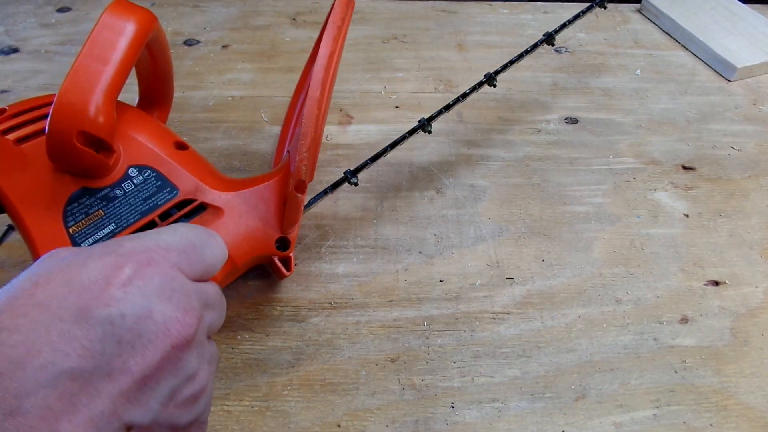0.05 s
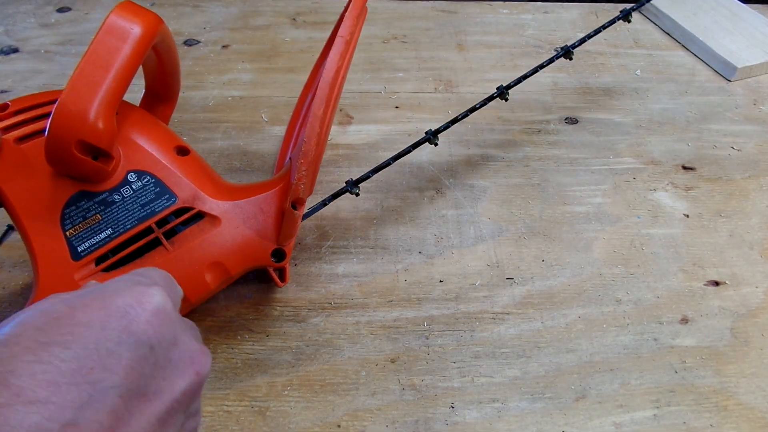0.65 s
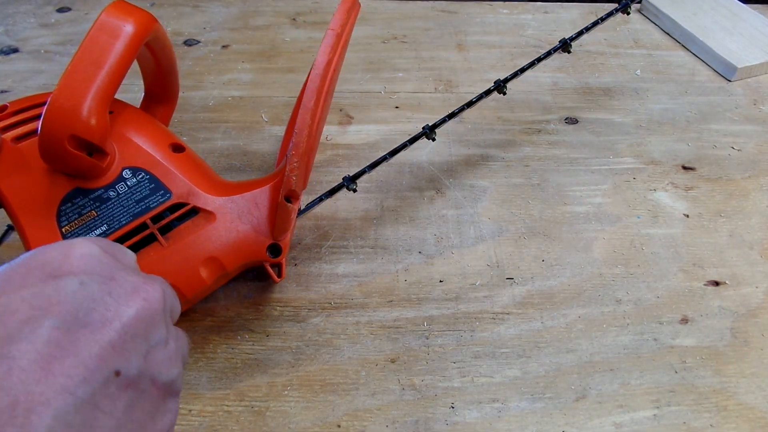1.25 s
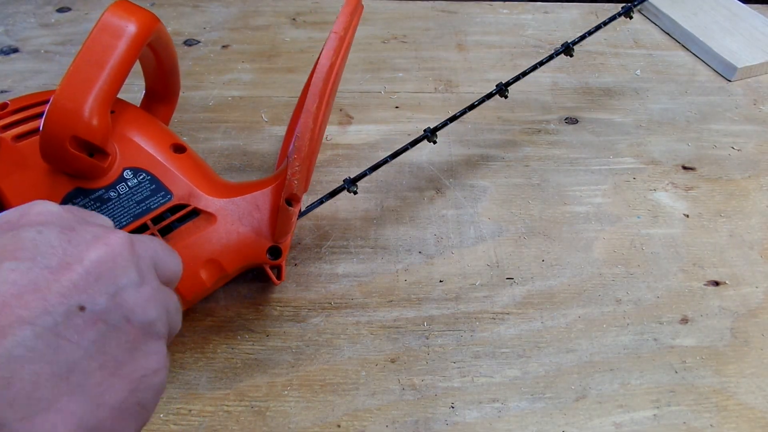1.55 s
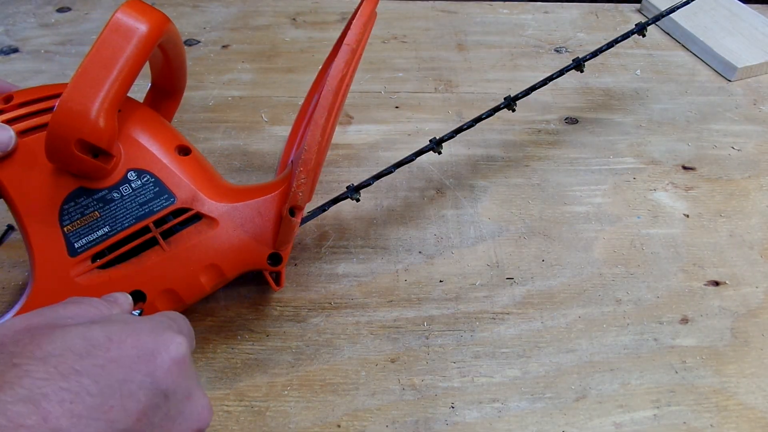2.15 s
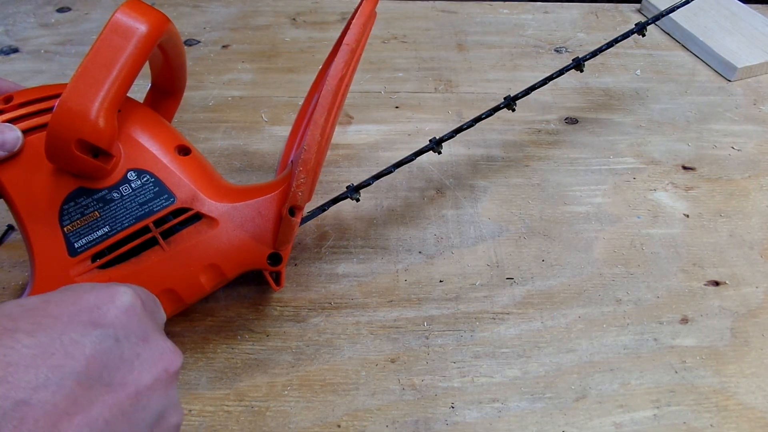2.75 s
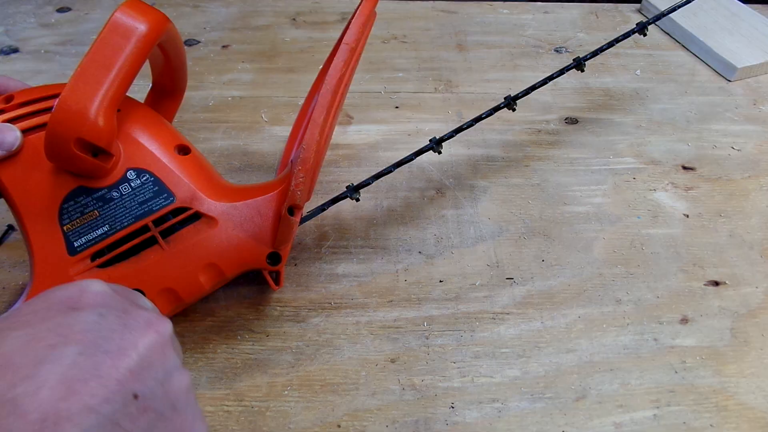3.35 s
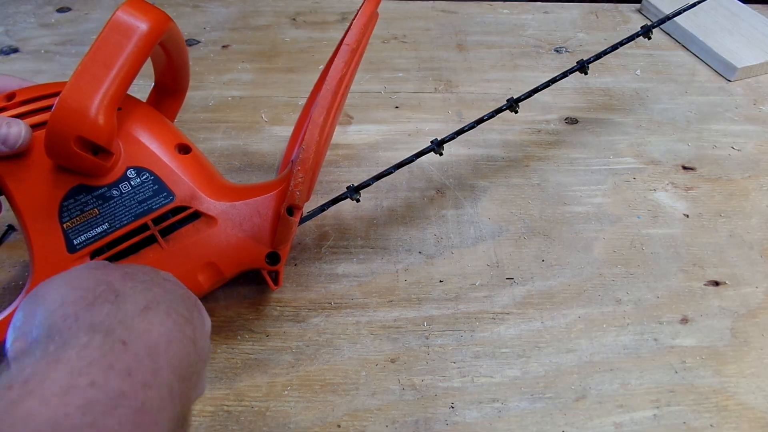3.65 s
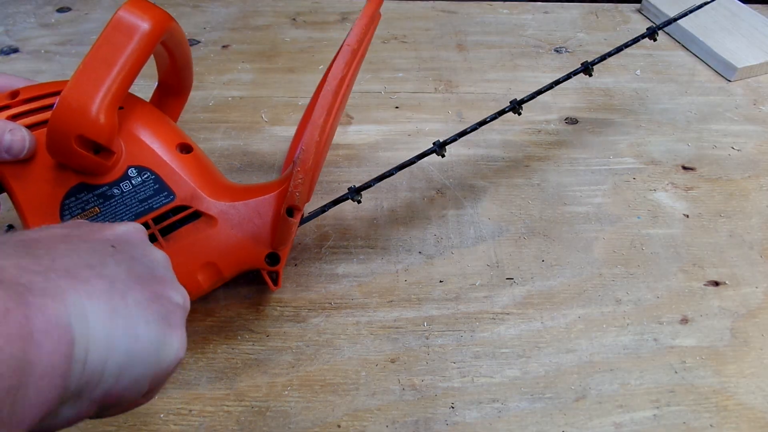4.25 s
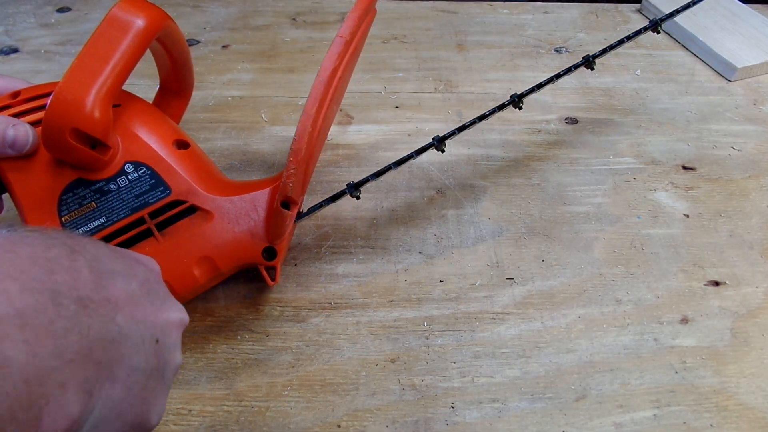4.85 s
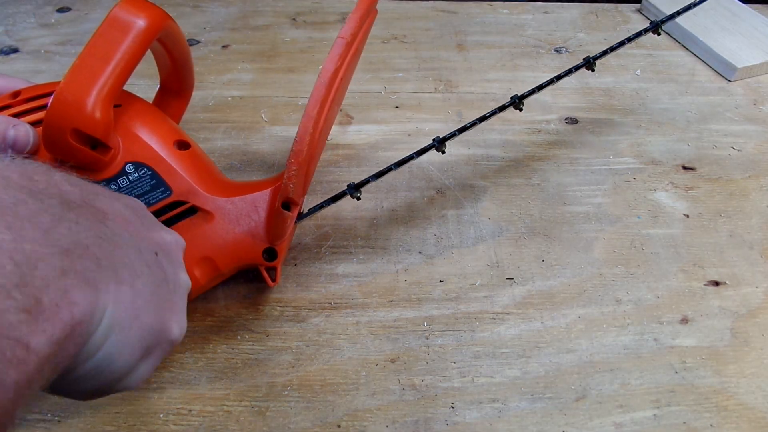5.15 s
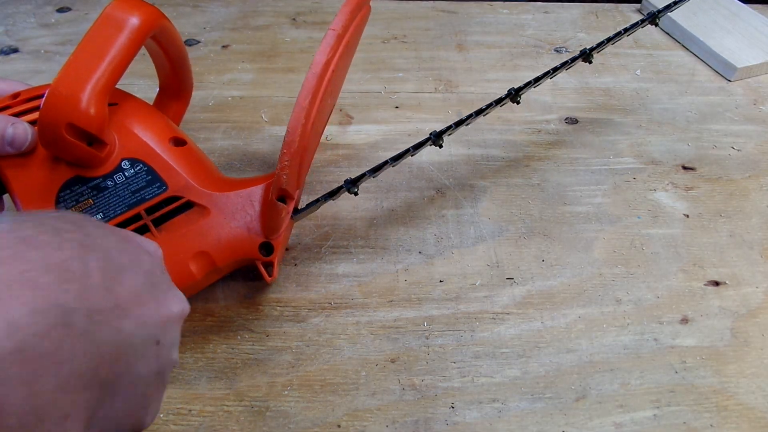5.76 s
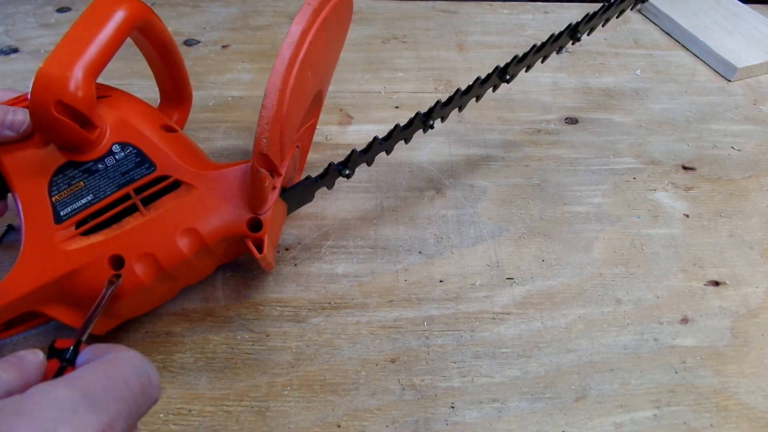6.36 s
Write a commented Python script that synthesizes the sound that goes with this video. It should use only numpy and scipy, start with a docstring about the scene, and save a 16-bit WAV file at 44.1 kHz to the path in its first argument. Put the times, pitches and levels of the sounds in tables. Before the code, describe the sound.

A hollow plastic tool housing snaps against a wooden workbench and lands with a thud. A screwdriver then works at stubborn screws, its tip slipping with irregular knocks, small metal clicks and short scrapes. A screw squeaks briefly about two seconds in. After a quieter spell, two sharper knocks stand out among lighter taps and soft hand rubbing. The sounds are close, with a short workshop echo and faint hiss.

```python
"""Hollow plastic knocks, dull thumps and a squeak: a screwdriver works stubborn screws out of a tool
housing on a wooden workbench. The tip slips and strikes the screw head; each impact excites the damped
modes of the shell and the bench. Stick-slip friction makes one thread squeak, the blade scrape in its
hole and the hand hiss on the grip. A bare workshop reverberates; faint hiss swells with each knock."""
import sys
import numpy as np
from scipy import signal
from scipy.fft import rfft, irfft, next_fast_len
from scipy.io import wavfile
from scipy.ndimage import uniform_filter1d

SR = 44100
rng = np.random.default_rng(int(sys.argv[2]) if len(sys.argv) > 2 else 0)


def waveform_to_disk(signal):
    """Save audio, clipped to [-1, 1], as 16-bit WAV at the path in sys.argv[1]."""
    frames = np.transpose(np.atleast_2d(signal))
    scaled = np.clip(frames, -1, 1) * 32767
    samples = np.round(scaled).astype(np.int16)
    wavfile.write(sys.argv[1], SR, samples)


N = 282235
T = np.arange(N) / SR
RING_T = T[:SR // 4]  # time axis of one impact

# the tip slips and lands: start_s, level_db, brightness_db, tick_db, ring_hz, rebound_db
TIP_KNOCKS = [(1.454, -27.5, -2, -48, 865, -12), (1.5, -19, -3.5, -63, 957, -4.5),
              (1.8138, -30, -4.5, -46, 714, 1.5), (1.924, -34.5, -16, -54, 630, -12),
              (1.946, -31, -14, -45, 1070, -9), (2.2112, -33, -8.5, -56, 1444, -20),
              (2.231, -29.5, -4, -47.5, 716, -13), (2.634, -27.5, -14, -50, 753, -12.5),
              (4.2, -15, -4, -22.5, 756, -12.5), (4.493, -27, -7, -51, 930, -4),
              (4.611, -33.5, -15, -50, 560, -3), (4.974, -34, -3.5, -46, 2850, -12),
              (5.066, -37, -21, -51, 817, -20), (5.218, -19, 2, -27.5, 886, -1.5),
              (5.607, -37.5, -17, -49, 884, -19)]
# the shell's dense, quickly damped overtones: frequency_hz, gain_db
CRACK_SPECTRUM = [(200, -24.5), (450, -4), (800, 2.5), (1800, -4), (3000, -8), (4000, -18), (6000, -28.5),
                  (10000, -34.5)]
# the bright part of sliding friction: frequency_hz, gain_db
CRISP_SPECTRUM = [(1500, -1), (4000, 0.5), (9000, 0.5), (13000, 0), (16000, -3)]


def undb(db):
    """Amplitude ratio of a level in decibels."""
    return 10 ** (np.asarray(db) / 20)


def colour(x, spectrum):
    """Minimum-phase filter: folding the cepstrum gives the spectral outline a causal response."""
    size = next_fast_len(len(x) + 4096, True)
    hz, db = np.transpose(spectrum)
    bin_hz = np.maximum(np.fft.rfftfreq(size, 1 / SR), 1)
    gain = undb(np.interp(np.log(bin_hz), np.log(hz), db))
    cepstrum = irfft(np.log(gain), size)
    cepstrum[1:size // 2] *= 2
    cepstrum[size // 2 + 1:] = 0
    return irfft(rfft(x, size) * np.exp(rfft(cepstrum)), size)[:len(x)]


def noise(spectrum):
    """Filtered Gaussian noise of unit rms."""
    x = colour(rng.standard_normal(N), spectrum)
    return x / x.std()


def waver(samples):
    """Random fluctuation of unit spread, smoothed by a moving average."""
    x = uniform_filter1d(rng.standard_normal(N), size=samples)
    return x / x.std()


def grains(rate_hz, spread_db, spectrum):
    """Friction as shot noise: randomly timed slips of uneven size, at unit rms."""
    slips = (rng.random(N) < rate_hz / SR) * rng.choice([-1, 1], N)
    sizes = undb(spread_db * np.minimum(rng.exponential(size=N), 4))
    x = colour(slips * sizes, spectrum)
    return x / x.std()


def stroke(peak_s, build_s, release_s):
    """Envelope of a slide: exponential growth, then exponential decay."""
    return np.exp(np.minimum((T - peak_s) / build_s, (peak_s - T) / release_s))


def decay(t60_s):
    """Exponential damping, 60 dB in t60_s."""
    return np.exp(-np.log(1000) * RING_T / t60_s)


def at_level(x, db):
    """Scale an impact so that the rms of its loudest 4 ms is db."""
    return x * undb(db) / np.sqrt(uniform_filter1d(x * x, size=SR // 250).max())


def burst(spectrum, t60_s):
    """Modal overlap: many close, damped resonances merge into decaying noise."""
    return colour(rng.standard_normal(len(RING_T)) * decay(t60_s), spectrum)


def ring(modes, spread_db, detune):
    """Superposition of damped modes; strike point and grip scatter their levels and pitches."""
    scatter = rng.standard_normal((len(modes), 2))
    out = 0
    for k, ((hz, db, t60_s), (strike, grip)) in enumerate(zip(modes, scatter)):
        tone = np.sin(2 * np.pi * hz * (1 + detune * grip) * RING_T)
        out += (-1) ** k * undb(db + spread_db * strike) * decay(t60_s) * tone
    return out


def add(out, start_s, x):
    """Superpose x on out from start_s."""
    start = max(int(start_s * SR), 0)
    out[start:start + len(x)] += x[:N - start]


def room_tone():
    """Ambient noise of a still room, strongest in the bass."""
    # still air: frequency_hz, gain_db
    air_spectrum = [(25, -4), (105, -3), (200, -1.5), (700, -4), (2000, -10), (6000, -26.5), (16000, -25)]
    return noise(air_spectrum) * undb(-61)


def reverberation(x, build_s):
    """Wall reflections build a diffuse field that decays soonest in the top treble."""
    # workshop reverberation: frequency_hz, level_db, t60_s
    room_bands = [(100, -14, 0.52), (248, -6.5, 0.73), (587, -7, 0.46), (1370, -5.5, 0.65),
                  (2730, -8.5, 0.52), (5000, -7, 0.53), (12000, -13, 0.25)]
    hz, db, t60_s = np.transpose(room_bands)
    t = T[:SR]
    log_hz = np.log(np.maximum(np.fft.rfftfreq(SR, 1 / SR), 1))
    spectrum = rfft(rng.standard_normal(SR))
    onset = 1 - np.exp(-(t / build_s) ** 2)
    response = 0
    for share, band_db, band_t60_s in zip(np.eye(len(hz)), db, t60_s):
        band = irfft(spectrum * np.interp(log_hz, np.log(hz), share), SR)
        envelope = np.exp(-np.log(1000) * t / band_t60_s) * onset
        response += undb(band_db) * band * envelope / np.linalg.norm(envelope)
    return signal.fftconvolve(x, response)[:N]


def hand():
    """Sliding friction of skin, crisper with speed, over the rumble of the arm's shifting load."""
    # the hand slides to a new grip: peak_s, build_s, level_db
    regrips = [(2.7, 0.14, -69), (3.58, 0.16, -54), (5.1, 0.092, -59), (5.88, 0.15, -55.5),
               (6.08, 0.078, -64)]
    # skin on the grip: frequency_hz, gain_db
    skin_spectrum = [(200, 10), (700, 15), (1500, 10), (3000, 8), (6000, -2.5), (10000, -3), (13000, 1),
                     (16000, -1)]
    # the loaded housing: frequency_hz, gain_db
    rumble_spectrum = [(25, -18), (65, 3.5), (80, -9.5), (110, 5.5), (150, -7.5), (350, -4.5), (700, -7),
                       (1500, -32)]
    # rumble under the arm's weight: time_s, level_db
    leaning = [(0, -53.5), (0.65, -52), (1.0, -65), (1.3, -56), (1.8, -55.5), (3.0, -55.5), (3.5, -55.5),
               (3.8, -56.5), (4.1, -51), (5.45, -54.5), (5.7, -56), (6.4, -62)]
    speed = sum(undb(db) * stroke(s, build_s, release_s=0.13) for s, build_s, db in regrips)
    rub = grains(rate_hz=12000, spread_db=2.5, spectrum=skin_spectrum) * undb(2.5)
    crisp = grains(rate_hz=3000, spread_db=3, spectrum=CRISP_SPECTRUM) * speed / speed.max()
    rumble = noise(rumble_spectrum) * undb(np.interp(T, *np.transpose(leaning)))
    return (rub + crisp) * speed + rumble


def blade_scrapes():
    """Friction of steel on plastic: dense micro-slips with sparse grit on top."""
    # the blade drags in the screw hole, then lets go: peak_s, build_s, level_db
    scrapes = [(1.675, 0.046, -43), (1.96, .04, -43), (4.02, 0.064, -55), (4.63, 0.049, -58),
               (4.801, 0.04, -51), (5.447, 0.016, -39), (5.889, 0.085, -43)]
    # steel on plastic: frequency_hz, gain_db
    scrape_spectrum = [(150, -23.5), (450, 0.5), (800, 2.5), (1300, 2), (2000, -7.5), (4000, -17),
                       (7000, -22), (16000, -28)]
    pressure = sum(undb(db) * stroke(s, build_s, release_s=0.042) for s, build_s, db in scrapes)
    grit = grains(rate_hz=250, spread_db=3.5, spectrum=CRISP_SPECTRUM)
    catching = undb(2.5 * waver(samples=400))
    drag = grains(rate_hz=1200, spread_db=0.5, spectrum=scrape_spectrum)
    return (drag + undb(-19.5) * grit) * pressure * catching


def bench_thump(db):
    """Modal response of the bench top, which radiates little below its first mode."""
    # the bench with the housing on it: frequency_hz, level_db, t60_s
    bench_modes = [(108.5, 4, 0.18), (113, -10, 0.4), (157, -13.5, 0.096), (199.7, -8.5, 0.21),
                   (260, -2, 0.063), (282, -4.5, 0.018), (335.2, -8.5, 0.2), (430, -7, 0.059)]
    radiation = signal.butter(2, 80, "high", fs=SR, output="sos")
    vibration = ring(bench_modes, spread_db=1, detune=0.015)
    return at_level(signal.sosfilt(radiation, vibration), db)


def steel_tick(db):
    """A hard, brief contact of steel on steel puts its energy in the treble."""
    # steel on steel: frequency_hz, gain_db
    tick_spectrum = [(1500, -28), (4500, 5.5), (6500, -1), (9500, -4.5), (12500, 0.5), (16000, -2)]
    return at_level(burst(tick_spectrum, t60_s=0.025), db)


def shell_blow():
    """Impulse response of the shell: distinct modes and the crack of overlapping overtones."""
    # resonances of the plastic shell: frequency_hz, level_db, t60_s
    shell_modes = [(560, -20, 0.057), (761, -3, 0.064), (853, 3, 0.042), (891, -14.5, 0.24),
                   (1150, -14, 0.012), (1324, -5, 0.07), (1670, -13.5, 0.13), (1882, 1.5, 0.024),
                   (2075, -2.5, 0.028), (2428, -6, 0.048), (2660, -1.5, 0.0095), (2785, -5.5, 0.027),
                   (3173, -2.5, 0.03)]
    ringing = ring(shell_modes, spread_db=2.5, detune=0.02)
    return at_level(ringing, -2) + at_level(burst(CRACK_SPECTRUM, t60_s=0.056), 0)


def hand_bumps():
    """A soft, long contact acts as a low-pass: the shell answers dully and the bench swells in."""
    # fingers and wrist bump the housing: start_s, thump_db
    bumps = [(.79, -48), (1.098, -49.5), (1.761, -42.5), (2.02, -47.5), (2.332, -46), (2.641, -44),
             (3.43, -44), (3.486, -45), (4.02, -43)]
    out = np.zeros(N)
    softness = signal.butter(1, 1500, fs=SR, output="sos")
    for start_s, db in bumps:
        dull = signal.sosfilt(softness, burst(CRACK_SPECTRUM, t60_s=0.069))
        bump = at_level(dull, db - 4.5) + bench_thump(db)
        add(out, start_s, bump * (1 - decay(0.032)))
    return out


def tip_clicks():
    """Light impacts on the screw head pass little energy to the shell."""
    # the unloaded tip feels for the slot: start_s, tick_db, shell_db
    clicks = [(1.273, -60, -52.5), (1.344, -62, -53), (1.661, -43, -36), (2.008, -48, -39),
              (2.563, -54, -41.5), (2.673, -49, -62), (3.2038, -39.5, -39.5), (3.275, -57, -45.5),
              (3.967, -58, -45.5), (4.002, -44, -40.5), (4.062, -54, -43.5), (4.64, -48, -53),
              (5.097, -47.5, -52), (5.909, -43.5, -43), (5.919, -60, -46.5)]
    out = np.zeros(N)
    for start_s, tick_db, shell_db in clicks:
        add(out, start_s, steel_tick(tick_db) + at_level(shell_blow(), shell_db))
    return out


def tip_skids():
    """Friction rasps briefly around each knock as the tip rides out of the slot."""
    envelope = sum(undb(db - 22) * stroke(s, build_s=0.0093, release_s=0.0093)
                   for s, db, *_ in TIP_KNOCKS)
    return envelope * grains(rate_hz=1700, spread_db=5, spectrum=CRACK_SPECTRUM)


def thread_squeaks():
    """Stick-slip oscillation at a shell resonance: an unsteady near sine, rising as the thread binds."""
    # the turning screw squeaks: start_s, length_s, pitch_hz, level_db
    squeaks = [(1.97, 0.033, 965, -30), (2.007, 0.0061, 1020, -23.5), (2.016, 0.019, 980, -33.5),
               (2.056, .013, 1000, -40.5), (2.095, .028, 975, -42), (2.13, 0.089, 1003, -51.5),
               (5.52, 0.0074, 925, -28)]
    attack_s, release_s, rise_hz_per_s = 0.0058, 0.0031, 330
    out = np.zeros(N)
    for start_s, length_s, hz, db in squeaks:
        age_s = np.maximum(T - start_s, 0)
        pitch_hz = (hz + rise_hz_per_s * np.minimum(age_s, length_s)) * (1 + 0.018 * waver(samples=150))
        phase = 2 * np.pi * np.cumsum(pitch_hz) / SR
        grip = (1 - np.exp(-age_s / attack_s)) * np.exp(-np.maximum(age_s - length_s, 0) / release_s)
        overtones = undb(-14) * np.sin(2 * phase) + undb(-25) * np.sin(3 * phase)
        amplitude = np.sqrt(2) * undb(db + 1.5 * waver(samples=200))
        out += amplitude * grip * (np.sin(phase) + overtones * grip)
    return out


def edge_snaps():
    """An edge of the housing snaps on the wood and excites the shell's cavity resonances."""
    # the edge strikes the bench: start_s, level_db, tick_db
    snaps = [(0.0359, -17.5, -28), (.0404, -15.5, -53)]
    # plastic edge on wood: frequency_hz, gain_db
    snap_spectrum = [(100, -23), (330, -7.5), (500, -1.5), (720, -7.5), (1250, 2.5), (1850, 4.5),
                     (2800, -7), (5000, -22), (9000, -27.5)]
    # the hollow of the shell: frequency_hz, level_db, t60_s
    cavity_modes = [(443, -6.5, 0.016), (563, -0.5, 0.044)]
    out = np.zeros(N)
    for start_s, db, tick_db in snaps:
        cavity = at_level(ring(cavity_modes, spread_db=0, detune=0), db - 3)
        snap = at_level(burst(snap_spectrum, t60_s=0.022), db)
        add(out, start_s, snap + cavity + steel_tick(tick_db))
    return out


def housing_drops():
    """The momentum of the whole housing drives the low modes of the bench."""
    # the housing rocks and lands flat: start_s, level_db, tick_db
    drops = [(0.2313, -17, -55), (4.204, -26, -53), (4.611, -44, -71)]
    # thud of the landing: frequency_hz, gain_db
    drop_spectrum = [(40, -28), (82, -13), (108, 1), (170, -6), (260, 5.5), (450, -2), (700, -8),
                     (2000, -17), (3000, -26), (7000, -40)]
    out = np.zeros(N)
    for start_s, db, tick_db in drops:
        thud = bench_thump(db) + at_level(burst(drop_spectrum, t60_s=0.086), db)
        crack = at_level(burst(CRACK_SPECTRUM, t60_s=0.022), db - 13)
        add(out, start_s, thud + crack + steel_tick(tick_db))
    return out


def tip_contact(brightness_db, ring_hz):
    """Impact excitation: each contact rings at its own pitch; a harder one favours upper shell modes."""
    lowpass, highpass = (signal.butter(3, 1700, kind, fs=SR, output="sos") for kind in ("low", "high"))
    blow = shell_blow()
    pitch_hz = ring_hz * (1 + 0.03 * rng.standard_normal())
    ping = at_level(decay(0.032) * np.sin(2 * np.pi * pitch_hz * RING_T), 0.014)
    lower = at_level(signal.sosfilt(lowpass, blow), -2)
    upper = at_level(signal.sosfilt(highpass, blow), brightness_db - 0.5)
    return (lower + ping + upper) * (1 - decay(0.0073))  # the blow spreads through the plastic


def tip_knocks():
    """The loaded tip lands and rebounds once; structure-borne sound carries the blow to the bench."""
    rebound_s, bench_share_db = 0.0068, -25
    out = np.zeros(N)
    for start_s, db, brightness_db, tick_db, ring_hz, rebound_db in TIP_KNOCKS:
        for delay_s, landing_db in ((0, 0), (rebound_s, rebound_db)):
            landing = tip_contact(brightness_db, ring_hz) * undb(db) + steel_tick(tick_db)
            add(out, start_s + delay_s, landing * undb(landing_db))
        add(out, start_s, bench_thump(db + bench_share_db))
    return out


def scene():
    """Direct sound of the work, its reverberant field and the room tone superpose."""
    # each side of the housing radiates its own mix of modes; the walls receive both
    front, back = (tip_knocks() + tip_clicks() + housing_drops() for _ in range(2))
    handling = tip_skids() + blade_scrapes() + hand_bumps()
    snaps = edge_snaps()
    squeaks = thread_squeaks()
    front_to_walls = front + handling + undb(-3) * squeaks  # the squeak is mostly direct, little echo
    back_to_walls = back + undb(-3) * np.sqrt(2) * snaps  # the edge faces the listener, not the walls
    echo = sum(reverberation(side, build_s=0.0077) for side in (front_to_walls, back_to_walls))
    return (front + snaps + handling + squeaks + echo / np.sqrt(2) + hand() + room_tone())[None]


def suppress_noise(x):
    """Downward expansion lowers quiet passages, so hiss swells with each knock and sinks after it."""
    threshold_db, cut_db_per_db, floor_db, memory_s = -45.5, 0.71, -8, 0.037
    pole = np.exp(-1 / (memory_s * SR))
    power = signal.lfilter([1 - pole], [1, -pole], x * x)
    level_db = 10 * np.log10(power + 1e-12)
    return x * undb(np.clip(cut_db_per_db * (level_db - threshold_db), floor_db, 0))


def record(dry):
    """Microphone self-noise joins the sound; an expander and a steep low-pass follow."""
    # microphone hiss: frequency_hz, gain_db
    hiss_spectrum = [(200, 10.5), (1500, 8.5), (3000, 5), (6000, 0.5), (10000, 2.5), (13000, -2.5),
                     (16000, -10)]
    hiss_db, cutoff_hz = -59.5, 16300
    heard = suppress_noise(dry + noise(hiss_spectrum) * undb(hiss_db))
    return signal.sosfilt(signal.ellip(8, 0.2, 70, cutoff_hz, fs=SR, output="sos"), heard)


dry = scene()
out = record(dry)
waveform_to_disk(out)
```